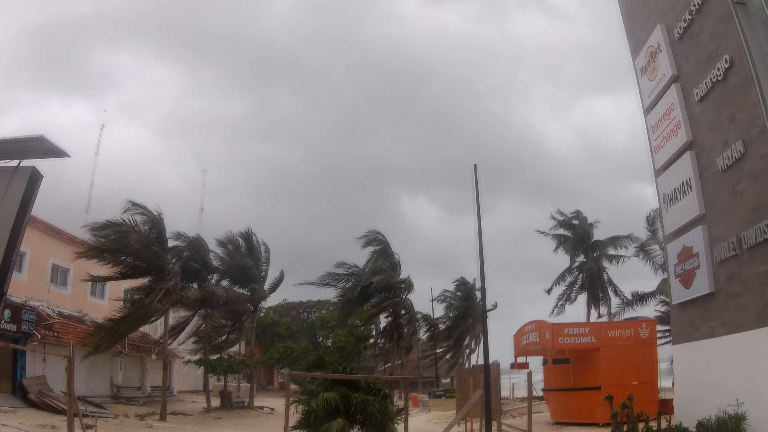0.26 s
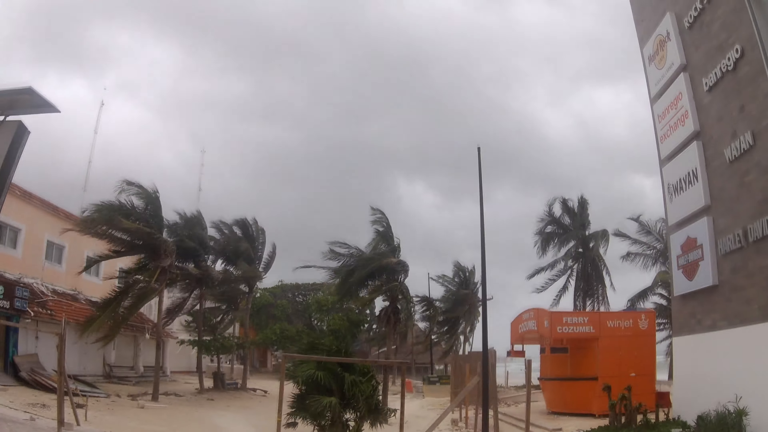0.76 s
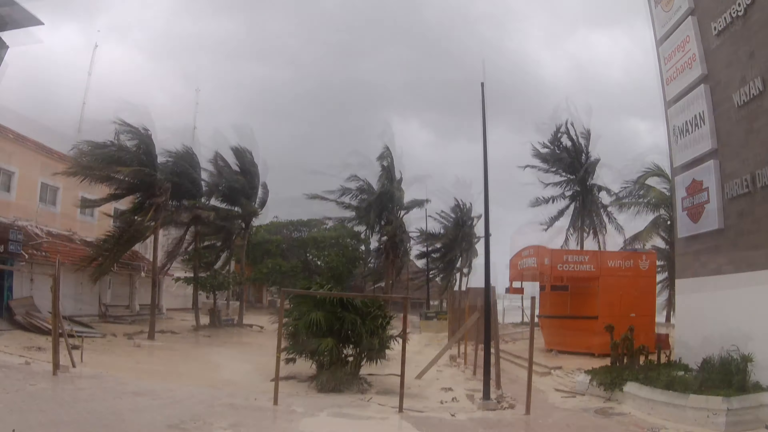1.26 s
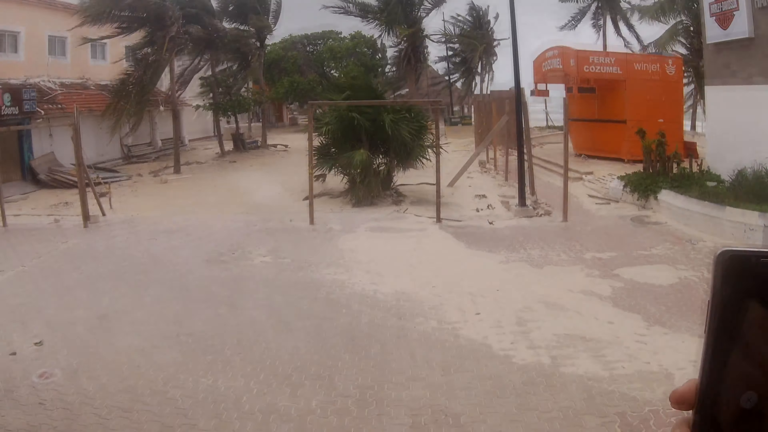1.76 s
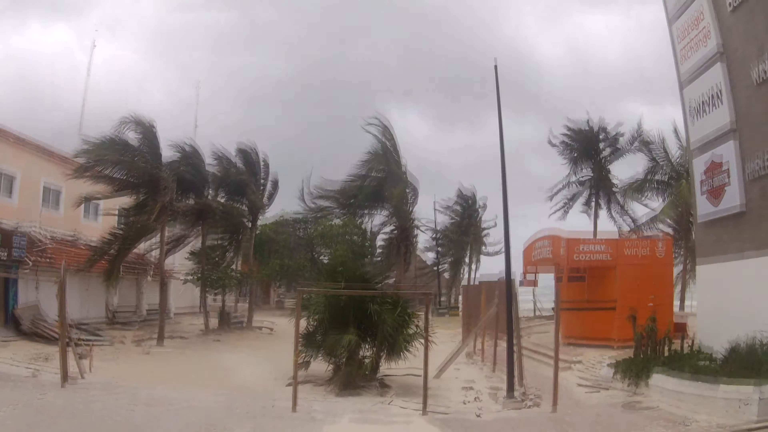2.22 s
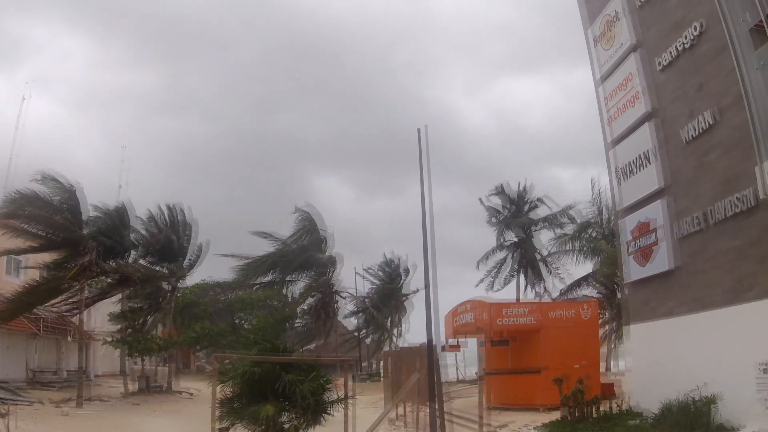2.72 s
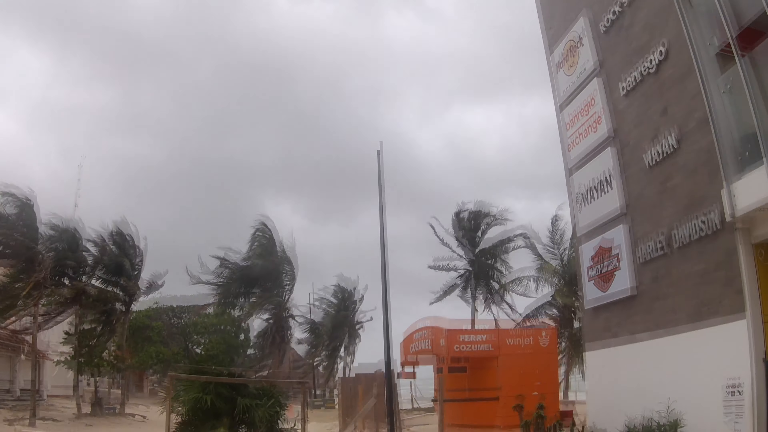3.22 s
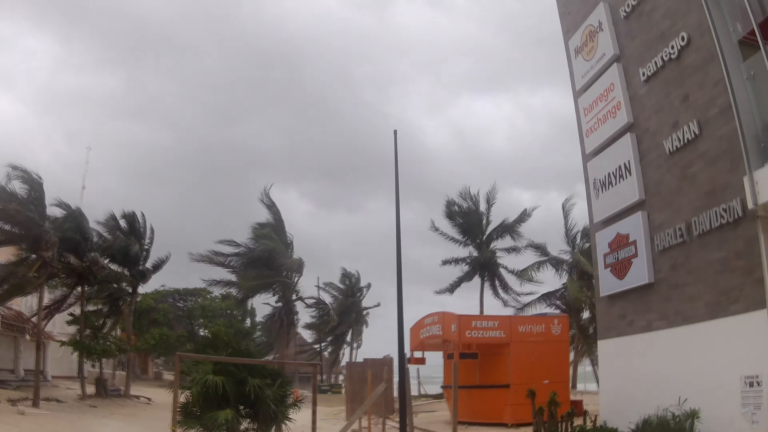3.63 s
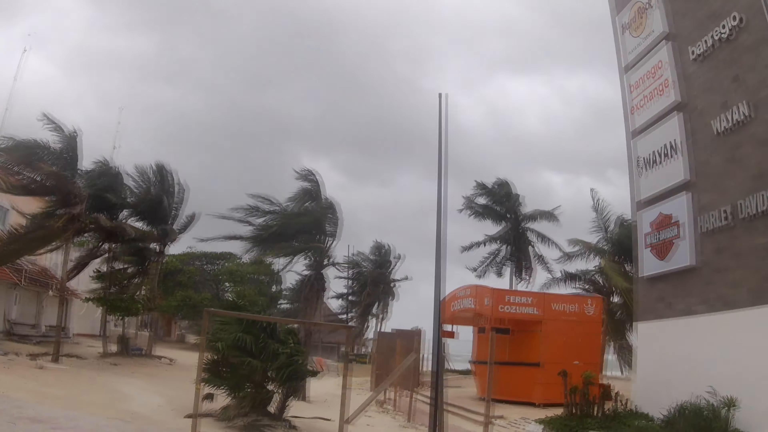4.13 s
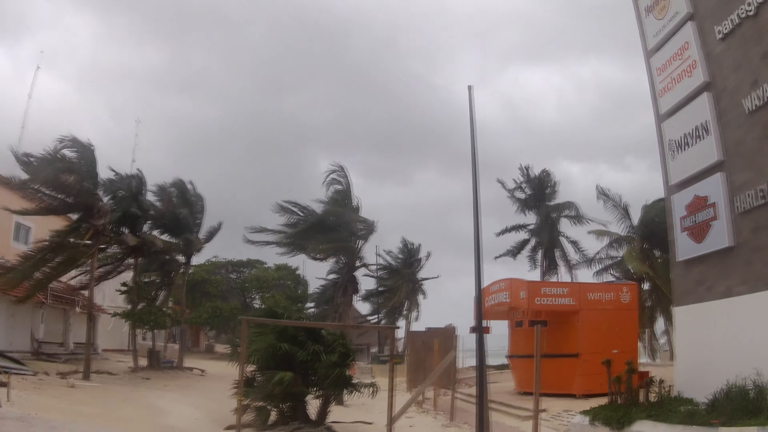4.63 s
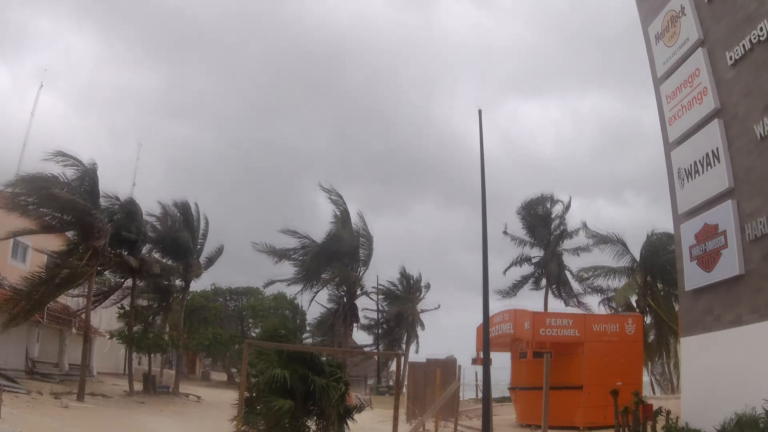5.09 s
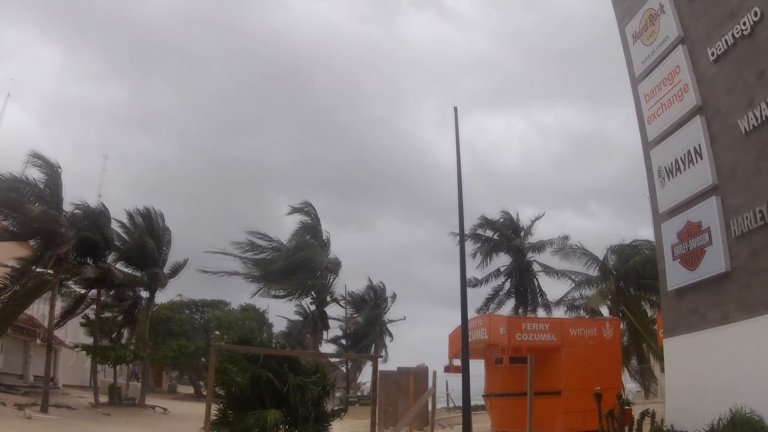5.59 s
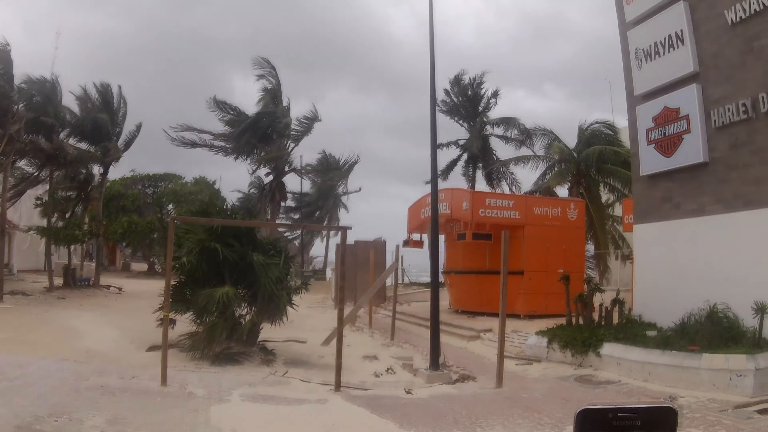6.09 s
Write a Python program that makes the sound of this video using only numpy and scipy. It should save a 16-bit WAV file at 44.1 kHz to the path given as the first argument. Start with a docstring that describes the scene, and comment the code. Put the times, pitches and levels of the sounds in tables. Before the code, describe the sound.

Inside a small camera's sealed plastic housing, outdoors in a storm, wind is a dull, boxy, quiet roar fluttering in quick puffs, with a low hum, thin hiss and faint steady leaf rustle. A faint tap comes at 1.35 s and a double tap around 2.0 s; the wind and low buffeting swell at 2.2-2.4 s with a brief skin rub, and a softer rub follows at 3.1 s. Small clustered clicks rattle at 3.5-3.6 s. At 4.33 s a very loud, hard plastic knock overloads the microphones, a rapid burst of short hollow rings. Lesser taps follow at 4.6-4.7 s, then handling rumble, with strong clacks at 4.88 and 5.1 s, dense finger scraping strongest near 5.3 s, and a thuddier knock at 5.54 s. Light taps at 5.7-5.8 s and soft rubbing near 6.15 s close it over muffled wind.

```python
"""Outdoors in a storm, inside the sealed plastic housing of a small camera, two microphones sit close behind ports.
Far leaves rustle evenly; noise in quick puffs drives the shell's resonances to hum, roar and hiss for the wind,
and from about 4.7 s to rumble for the handling. Close up, fingers slide on the walls as dense random clicks, with
grit ticking in the treble. Fingers and the mount knock: each blow is a burst of decaying rings, and the hardest
overload the input."""
import sys
import numpy as np
from scipy import signal
from scipy.fft import rfft, irfft
from scipy.io import wavfile
from scipy.ndimage import uniform_filter1d

SR = 44100
rng = np.random.default_rng(int(sys.argv[2]) if len(sys.argv) > 2 else 0)


def boost(x):
    """Linear amplitude factor 10**(x/20) for a level x in decibels (scalar or array-like)."""
    u = np.asarray(x, float) / 20
    return 10 ** u


def waveform_to_disk(signal):
    """Save audio, clipped to [-1, 1], as 16-bit WAV at the path in sys.argv[1]."""
    frames = np.transpose(np.atleast_2d(signal))
    scaled = np.clip(frames, -1, 1) * 32767
    samples = np.round(scaled).astype(np.int16)
    wavfile.write(sys.argv[1], SR, samples)


N = 280035

# wind on the shell and, from about 4.7 s, rumble from handling it, ahead of the ports:
# (time [s], roar in the cavity [dB], low buffeting or rumble [dB])
SHELL_LEVELS = [(0, -47.5, -57.5), (.45, -48, -66), (.65, -53, -75), (1.21, -49.5, -58.5), (1.3, -45, -55),
                (1.43, -51.5, -64), (1.9, -49.5, -63), (2.03, -46.5, -48), (2.11, -51, -53),
                (2.26, -37.5, -43.5), (2.31, -44, -50), (2.39, -36.5, -50), (2.55, -43.5, -55),
                (3.06, -45.5, -58.5), (3.14, -42.5, -52), (3.27, -51, -63), (3.63, -47, -57),
                (3.75, -51, -59), (4.66, -50.5, -67.5), (4.85, -47, -47.5), (5.24, -45, -49.5),
                (5.42, -42.5, -56), (5.53, -45.5, -44), (5.63, -48.5, -51.5), (5.82, -45.5, -43.5),
                (6.05, -50.5, -57), (6.17, -48.5, -43), (6.35, -49.5, -58)]
# fingers sliding on the shell, levels relative within a column:
# (firmest pressure [s], rise [s], fall [s], drag of the skin [dB], bright ticks [dB])
SLIDES = [(2.252, 0.1, 0.043, -42.5, -79), (3.14, 0.033, 0.044, -49.5, -88),
          (4.79, 0.071, 0.15, -51.5, -66.5), (4.868, 0.015, 0.013, -47, -51),
          (4.962, 0.081, 0.066, -47, -68), (5.126, 0.05, 0.069, -39.5, -68.5),
          (5.324, 0.059, 0.084, -32.5, -69), (5.691, 0.02, 0.026, -63, -69), (5.80, 0.085, .05, -55.5, -84),
          (6.15, 0.076, .05, -54, -75.5)]
# blows: (time [s], peak ahead of the ports [dB], pitch of the spot struck [Hz],
#         second pitch [Hz], second pitch over the first [dB])
BLOWS = [(1.351, -31.5, 1310, 614, -29), (2.01, -31, 1310, 570, -7), (2.055, -33.5, 1280, 619, -15),
         (3.497, -41.5, 790, 626, -17), (3.575, -29, 1090, 556, 1), (3.581, -26.5, 1150, 563, 2),
         (3.584, -23, 1110, 2030, -9.5), (3.593, -27, 1050, 600, -5), (4.3263, 7.5, 1072, 2170, -19.5),
         (4.3322, -5.5, 1075, 2190, 8.5), (4.3378, 1, 1072, 3330, -11.5), (4.3428, -10, 1150, 790, -4),
         (4.3559, -14.5, 1075, 600, -16), (4.569, -18, 1050, 3350, -28), (4.573, -24, 1014, 640, -16),
         (4.71, -29.5, 785, 3450, -5), (4.863, -36, 2200, 4000, 10), (4.873, -13, 1169, 3280, -10),
         (4.8776, 0.5, 1284, 2740, -4), (4.895, -36, 1240, 5850, 9), (4.952, -36, 1310, 2400, 3),
         (5.076, -14, 1267, 732, 3.5), (5.103, -5.5, 1197, 550, -15), (5.114, -29, 1320, 2750, -4),
         (5.137, -26.5, 1310, 2980, -8), (5.219, -31, 1330, 433, -13), (5.261, -27, 2170, 3300, -7),
         (5.272, -22, 1200, 3480, 2), (5.304, -21.5, 1350, 2170, -13), (5.388, -28.5, 1080, 650, -6),
         (5.54, -14.5, 1393, 213, 2), (5.546, -13, 1274, 218, 5.5), (5.568, -25.5, 1260, 635, -19),
         (5.573, -30, 1260, 700, 5), (5.69, -31.5, 1160, 3420, 2), (5.717, -29.5, 1150, 332, 13),
         (5.771, -30.5, 1250, 400, -8), (6.164, -37, 1230, 4000, 12)]
# resonances of the shell and its air as the two microphones hear them:
# (pitch [Hz], left minus right [dB], left leads [rad], likeness of left and right [0-1])
RESONANCES = [(70, -.5, .1, .9), (135, -1, .1, .95), (222, -1, .1, .98), (350, -.5, .1, .88),
              (570, -1, .1, .6), (625, -3, .1, .6), (790, -1, .3, .5), (965, .5, 0, .9), (1050, .5, 0, .93),
              (1117, -.5, .05, .95), (1215, -1, .1, .96), (1312, -2.2, .1, .98), (1405, -4, -.3, .8),
              (1900, -2, -2.8, .4), (2170, 6, 2.6, .4), (2430, 5, 2.4, .5), (2720, 1, -.6, .3),
              (3330, -5, -2, .4), (4020, -1, -1.3, .92), (4350, -1, -1.2, .8), (5300, 1, 1.4, .2),
              (5850, .5, 2.8, .2), (6800, 4, -1.5, .1), (8200, 1.5, 1.7, 0), (10000, 1.5, -2.2, 0)]
# how each resonance rings, in the same order, levels relative:
# (width [Hz], under wind or handling [dB], under a blow [dB])
RINGING = [(90, 4, -14), (90.5, -11.5, -14.5), (49.5, 1, -13), (166, -6, 0.5), (57, -20, -3.5),
           (74, -18, 4), (106, -22.5, -3.5), (80, -17, -6.5), (60, -9, -2.5), (58, -10, 3),
           (88, -4.5, -0.5), (70, 1.2, 2), (88.5, -15.5, -15), (234, 1, -1.5), (234, 0, 7), (176, -24, 2.5),
           (247, -7, 0), (360, -14, -3.3), (325, -1.55, -4.5), (248, -8, -14), (350, -6, -23.5),
           (400, -1.5, -7), (600, -4, -8), (900, -9.5, -19.5), (1400, -20, -29.5)]
# response of the microphones behind their ports: (frequency [Hz], gain [dB])
PORT_RESPONSE = [(20, 18.5), (150, 0.5), (400, -2.5), (800, 0.12), (1400, 1.5), (1650, -0.5), (2150, 2.5),
                 (2600, 0), (3300, 5.5), (3700, 1.5), (4000, 5), (4600, -1.5), (6500, -13.5), (9000, -15),
                 (13000, -32.5), (20000, -55.5)]

# limits of the deep, low, middle and high resonances; the top ones lie above
DEEP_HZ, LOW_HZ, HIGH_HZ, TOP_HZ = 150, 480, 1600, 4800
LEAVES_DB, HUM_DB = -64.5, -69.5  # rms ahead of the ports
# the walls hiss steadily, and more as the roar grows: steady level, part relative to the roar
HISS_DB, HISS_UNDER_ROAR_DB = -63, -10
# the deepest shudder follows the low level, less steeply: level at 0 dB of low level, dB per dB
SHUDDER_DB, SHUDDER_PER_DB = -18, .7
SLIDE_FADE_DB = -20  # one rise before or one fall after the firmest pressure
# the crack of a blow: relative to a high second pitch; else at 0 dB peak, and its growth per dB
CRACK_HIGH_DB, CRACK_LOW_DB, CRACK_PER_DB = -6, -12, 0.34
INPUT_NOISE_DB = -91


def level(x, db):
    """Scale to an rms level."""
    return x * boost(db) / np.sqrt(np.mean(x ** 2))


def curve(table, column):
    """One column of a table, sample by sample."""
    rows = np.array(table)
    return np.interp(np.arange(N) / SR, rows[:, 0], rows[:, column])


def walk(rate):
    """Random levels held 1 / rate s and slewed twice; spread near 1."""
    hold = int(SR / rate)
    steps = np.repeat(rng.standard_normal(N // hold + 1), hold)
    slewed = uniform_filter1d(uniform_filter1d(steps, hold), hold)
    return 1.09 * slewed[:N]


def modes():
    """Rows of (Hz, width, wind dB, blow dB, balance dB, lead, likeness)."""
    return [(hz, *ring, *place) for (hz, *place), ring in zip(RESONANCES, RINGING)]


def ears(balance_db, lead):
    """Gain and phase of one resonance at the left and right microphone."""
    half = np.array([[.5], [-.5]])
    return boost(balance_db * half) * np.exp(1j * lead * half)


def resonate(force, hz, width, balance_db, lead):
    """One decaying resonance, gain near 1 at its centre, as the two microphones hear it."""
    fade = np.exp(-np.pi * width / SR)
    pole = fade * np.exp(2j * np.pi * hz / SR)
    ring = signal.lfilter([2 * (1 - fade)], [1, -pole], force)
    return (ring * ears(balance_db, lead)).imag


def pair(mid, side, likeness):
    """Left and right forces that agree by the given share."""
    likeness = np.clip(likeness, 0, 1)
    shared = np.sqrt((1 + likeness) / 2) * mid
    opposed = np.sqrt((1 - likeness) / 2) * side
    return shared + opposed * np.array([[1], [-1]])


def shaken(mode):
    """Noise drives one resonance, which flickers on its own."""
    hz, width, wind_db, _, balance_db, lead, likeness = mode
    flicker = boost(wind_db + 0.37 * walk(12))
    force = pair(*rng.standard_normal((2, N)), likeness) * flicker
    return resonate(force, hz, width, balance_db, lead)


def leaves():
    """Far leaves rustle evenly through the top resonances, untouched by the puffs."""
    return level(sum(shaken(mode) for mode in modes() if mode[0] >= TOP_HZ), LEAVES_DB)


def hum():
    """A low resonance near 222 Hz hums on under steady, narrow noise."""
    ring = resonate(rng.standard_normal(N) * boost(2.3 * walk(20)), RESONANCES[2][0], 35, -1, .1)
    return level(ring, HUM_DB)


def wind_and_handling():
    """Wind, and later handling, shakes the resonances together in quick puffs: roar, low sound, shudder, hiss."""
    puffs = walk(35)
    deep = low = middle = high = 0
    for mode in modes():
        hz = mode[0]
        if hz >= TOP_HZ:
            continue
        ring = shaken(mode)
        if hz < DEEP_HZ:
            deep = deep + ring
        elif hz < LOW_HZ:
            low = low + ring
        elif hz < HIGH_HZ:
            middle = middle + ring
            # the lower wall resonances thump along with the low sound
            low = low + boost(8.0) * ring * (hz < 900)
        else:
            high = high + ring
    roar_gain = boost(curve(SHELL_LEVELS, column=1))
    low_db = curve(SHELL_LEVELS, column=2)
    roar = level(middle * boost(1.97 * puffs), 0) * roar_gain
    rumble = level(low * boost(2.66 * puffs + 4.3 * walk(11)), 0) * boost(low_db)
    shudder = level(deep * boost(2.8 * puffs + 4.9 * walk(11)), SHUDDER_DB) * boost(SHUDDER_PER_DB * low_db)
    hiss_gain = np.hypot(boost(HISS_DB), boost(HISS_UNDER_ROAR_DB) * roar_gain)
    hiss = level(high * boost(2.0 * puffs), 0) * hiss_gain
    return roar + rumble + shudder + hiss


def slips(rate, spread_db):
    """Random clicks of uneven size, rate per second, rms 1."""
    clicks = rng.random(N) < rate / SR
    return level(clicks * boost(spread_db * rng.exponential(size=N)), 0)


def pressure(column):
    """Each slide swells to its firmest moment and fades again."""
    t = np.arange(N) / SR
    total = 0
    for row in SLIDES:
        firmest, rise, fall = row[:3]
        distance = np.maximum((firmest - t) / rise, (t - firmest) / fall)
        total = total + boost(row[column] + SLIDE_FADE_DB * distance ** 2)
    return total


def scrapes():
    """Skin sticks and slips densely over the walls; grit under it ticks in the treble, partly sparse."""
    drag = pressure(column=3) * slips(3200, 3.2) * boost(7.5)
    grit = slips(170, 1.9) + 0.74 * slips(3000, 2.6)
    ticks = pressure(column=4) * grit * boost(37.5)
    out = 0
    for hz, width, _, blow_db, balance_db, lead, likeness in modes():
        if hz < TOP_HZ:
            contact = drag * min(hz / 1050, 1) ** 2.2
        else:
            contact = ticks * (5850 / hz) ** 1.3
        force = pair(*(contact * rng.standard_normal((2, N))), likeness)
        out = out + boost(blow_db) * resonate(force, hz, width, balance_db, lead)
    return out


def mount_rattles(t):
    """Loose parts of the mount rattle for a few milliseconds, differently at each microphone."""
    loose = signal.butter(2, [1700, 5200], "band", fs=SR, output="sos")
    noise = rng.standard_normal((len(BLOWS), 2, len(t)))
    return signal.sosfilt(loose, noise) * np.exp(-t / 0.0034)


def knocks():
    """Each blow rings the spot struck, a second spot and a crack above; the next damps its upper rings."""
    hz, width, _, blow_db, balance_db, lead, _ = np.array(modes()).T[:, :, None]
    t = np.arange(SR // 12) / SR
    rings = np.exp((2j * np.pi * hz - np.pi * width) * t) * boost(blow_db)
    sides = ears(balance_db.T, lead.T)
    scatter = boost(2.1 * rng.standard_normal((len(BLOWS), len(RESONANCES))))
    rattles = mount_rattles(t)
    # the stiff walls' ring carries little below 430 Hz; the thud is added apart
    stiff = signal.butter(4, 430, "high", fs=SR, output="sos")
    # the push takes a moment to build
    push = 1 - np.exp(-(t / .0007) ** 2)
    # time until the next contact
    free = np.diff(np.array(BLOWS)[:, 0], append=N / SR)
    out = np.zeros((2, N + len(t)))
    for blow_row, chance, rattle, free_s in zip(BLOWS, scatter, rattles, free):
        s, peak_db, spot_hz, second_hz, second_db = blow_row
        if second_hz > HIGH_HZ:
            crack_db = second_db + CRACK_HIGH_DB
        else:
            crack_db = CRACK_LOW_DB + CRACK_PER_DB * peak_db
        near = np.exp(-(np.log2(hz / spot_hz) / .07) ** 2)
        near = near + .07 * (hz > LOW_HZ) * (hz < HIGH_HZ)
        second = np.exp(-(np.log2(hz / second_hz) / 0.12) ** 2)
        share = near + boost(crack_db) * (hz > HIGH_HZ) + boost(second_db) * second
        # a new contact stops the upper rings fast; the low ones carry on under it
        damped = np.exp(-np.maximum(t - free_s, 0) / .001 * (hz > 700))
        heard = sides * chance * share.T
        ring = ((heard * (hz.T > LOW_HZ)) @ (rings * damped)).real
        ring = ring + boost(crack_db + 6.5) * rattle
        thud = ((heard * (hz.T < LOW_HZ)) @ rings).imag
        blow = signal.sosfilt(stiff, ring * push) + thud * push
        start = int(s * SR)
        # the peak is that of the two microphones' average
        out[:, start:start + len(t)] += boost(peak_db) * blow / np.abs(blow.mean(axis=0)).max()
    return out[:, :N]


def scene():
    """From the far leaves to the blows on the shell, as they stand ahead of the ports."""
    return leaves() + hum() + wind_and_handling() + scrapes() + knocks()


def ports(dry):
    """The ports colour the sound by a minimum-phase filter, built by folding the cepstrum."""
    hz, db = np.transpose(PORT_RESPONSE)
    bins_hz = np.maximum(np.arange(513) * SR / 1024, 1)
    log_gain = np.log(boost(np.interp(np.log(bins_hz), np.log(hz), db)))
    cepstrum = irfft(log_gain)
    cepstrum[1:512] *= 2
    cepstrum[513:] = 0
    response = irfft(np.exp(rfft(cepstrum)))
    return signal.fftconvolve(dry, response[None], axes=1)[:, :N]


def microphone_input(heard):
    """The input overloads softly, then its filters reshape the flattened tops and noise is added."""
    top = .48  # full-scale share at which the input saturates
    clipped = top * np.tanh(heard / top)
    # the filters cut bass and top and delay the overtones, so flat tops come out pointed
    poles = signal.iirnotch(2250, 2.1, fs=SR)[1]
    shifted = signal.lfilter(poles[::-1], poles, clipped)
    lean = signal.sosfilt(signal.butter(2, [290, 8600], "band", fs=SR, output="sos"), shifted)
    return lean + level(rng.standard_normal(lean.shape), INPUT_NOISE_DB)


def band_limit(x):
    """A steep low-pass at the top of the band."""
    return signal.sosfilt(signal.butter(12, 13610, fs=SR, output="sos"), x)


def record(dry):
    """Two microphones in the housing take the sound through their ports into an easily overloaded input."""
    mix = microphone_input(ports(dry))
    return band_limit(mix)


dry = scene()
out = record(dry)
waveform_to_disk(out)
```